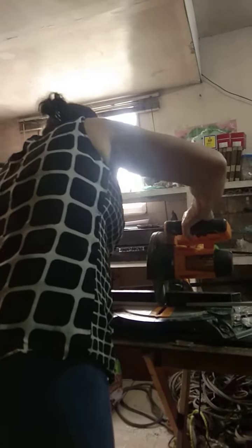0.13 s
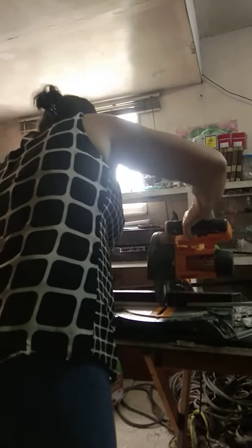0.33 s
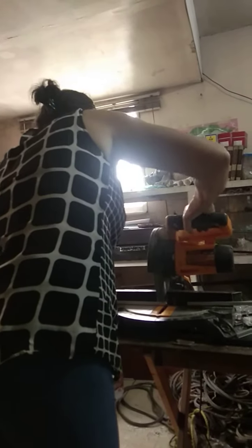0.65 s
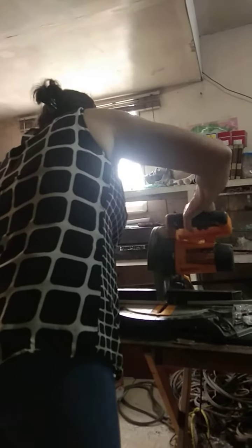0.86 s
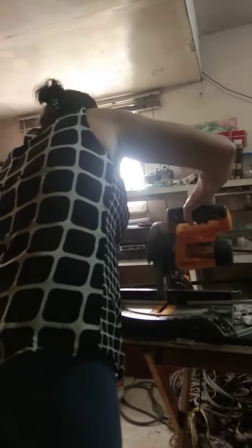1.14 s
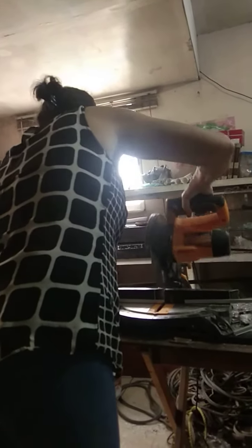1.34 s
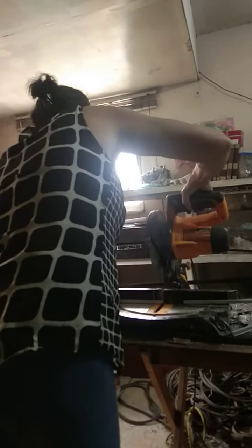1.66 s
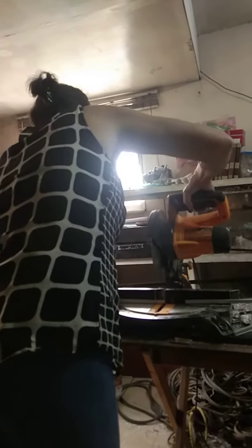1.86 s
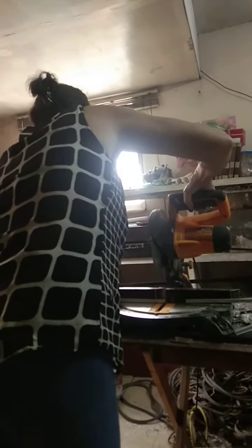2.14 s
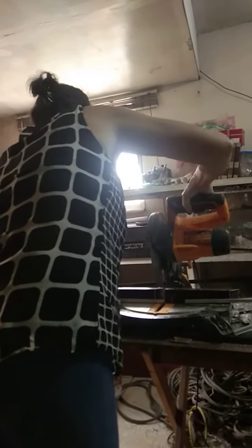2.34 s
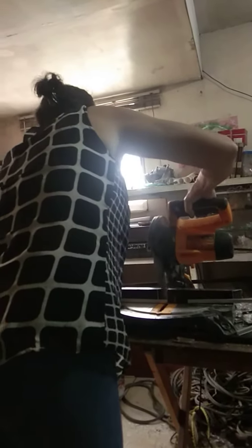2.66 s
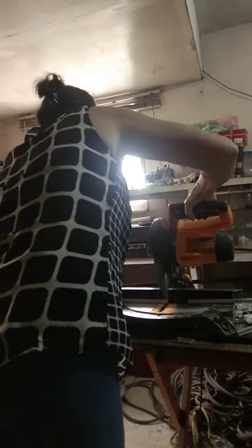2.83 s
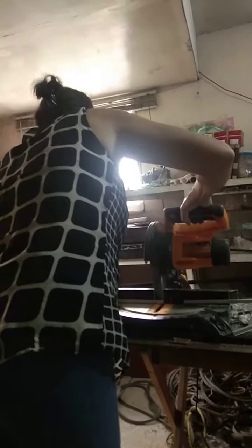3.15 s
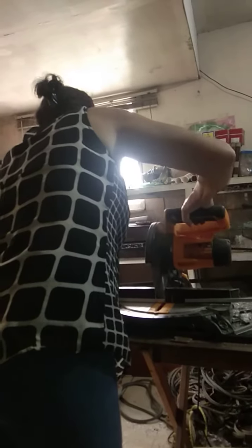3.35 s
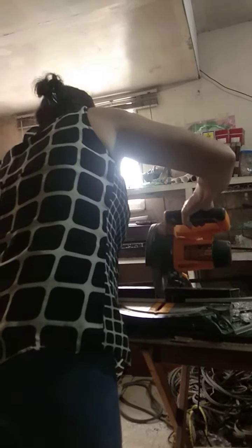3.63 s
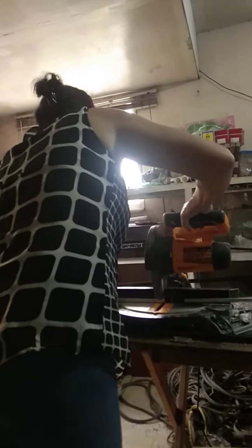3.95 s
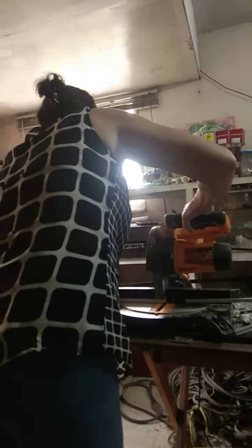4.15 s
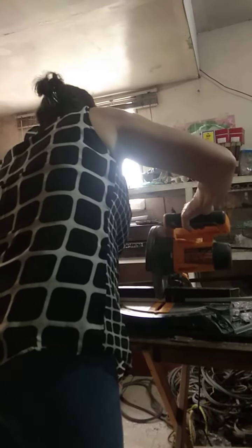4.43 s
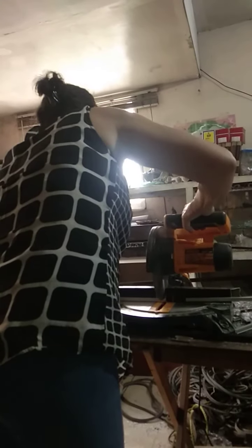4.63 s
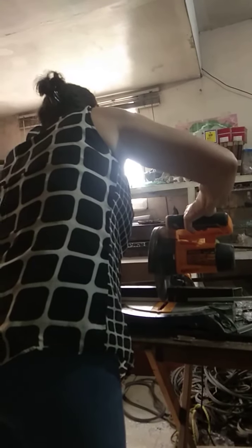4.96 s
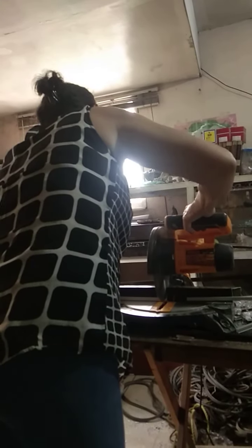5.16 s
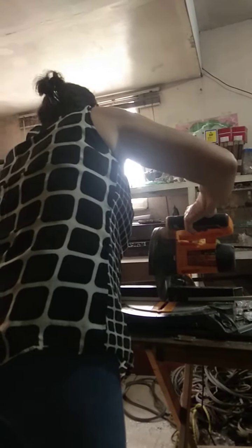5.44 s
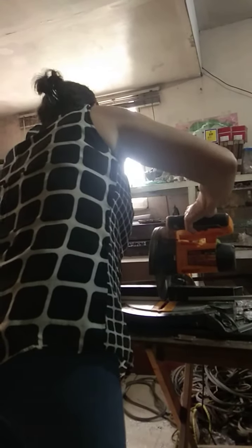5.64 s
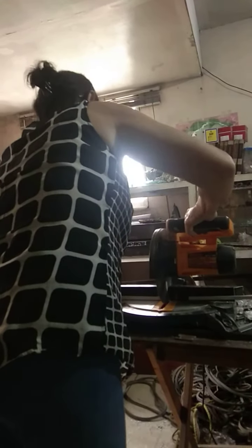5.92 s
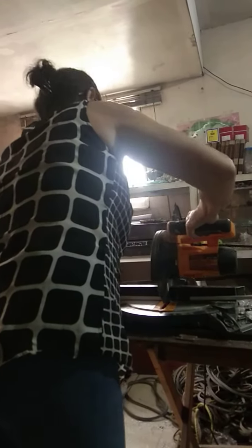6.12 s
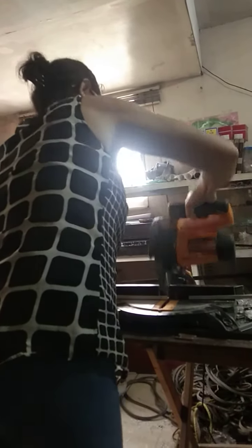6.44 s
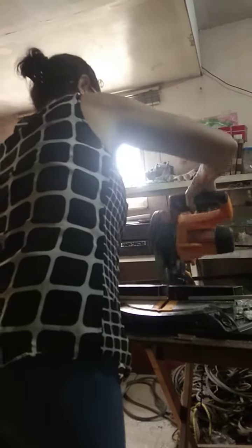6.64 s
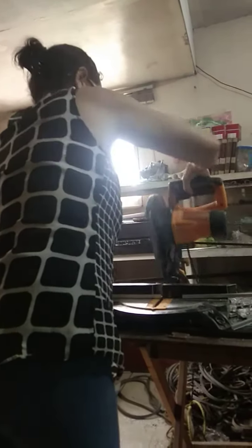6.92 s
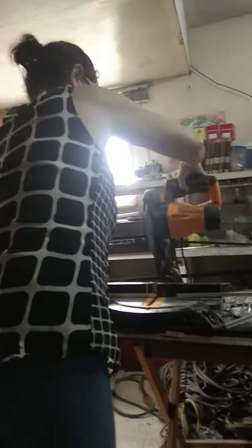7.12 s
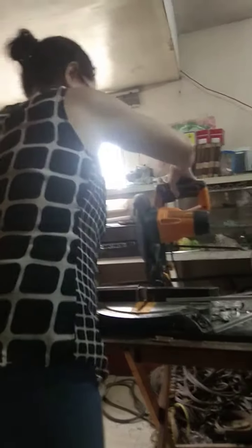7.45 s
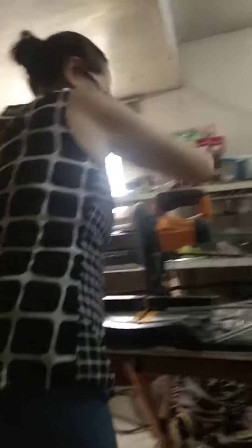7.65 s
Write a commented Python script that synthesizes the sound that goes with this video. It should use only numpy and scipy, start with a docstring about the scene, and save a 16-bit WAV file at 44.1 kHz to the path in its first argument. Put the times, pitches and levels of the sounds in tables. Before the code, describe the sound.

An electric miter saw snaps on, whines up to speed, squeals and knocks through a brief cut, then starts winding down.

```python
"""A small workshop, close to an electric mitre saw; outside, an engine idles over a low drone.
A hand rubs the grip, the switch snaps, and the motor kicks and runs up: its fourteen-bladed fan whines
at the blade-passing frequency over rushing air, gear rattle and hiss from vents, brushes and teeth.
The blade binds in the work with a thin stick-slip squeal and a few knocks; then the saw coasts down
against drag and friction, and the blade starts to ring in its natural modes."""
import sys
import numpy as np
from scipy import signal
from scipy.fft import rfft, irfft
from scipy.io import wavfile
from scipy.ndimage import uniform_filter1d, minimum_filter1d

SR = 44100
rng = np.random.default_rng(int(sys.argv[2]) if len(sys.argv) > 2 else 0)


def persist_wave(psi):
    """Save psi, clipped to +-1, as 16-bit WAV."""
    counts = np.round(np.clip(psi, -1, 1) * 32767).astype(np.int16)
    wavfile.write(sys.argv[1], SR, np.atleast_2d(counts).T)


N = 343098
TIME = np.arange(N) / SR
BINS = np.maximum(np.fft.rfftfreq(N, 1 / SR), 1)
START_S, STOP_S = 1.901, 6.562   # motor on and off
TOP_HZ = 494.2   # free-running rotor speed; every speed is in turns per second


def from_db(db):
    """Decibels to amplitude ratio."""
    return 10 ** (np.asarray(db) / 20)


def in_time(rows):
    """A (time_s, value) curve interpolated at every sample."""
    return np.interp(TIME, *np.transpose(rows))


def at_hz(response, hz):
    """Gain of a frequency response at the given pitches."""
    knots, db = np.transpose(response)
    return from_db(np.interp(np.log(hz), np.log(knots), db))


def shaped(gain):
    """White noise filtered by a gain at each frequency, then scaled to unit power."""
    x = irfft(rfft(rng.standard_normal(N)) * gain, N)
    return x / np.sqrt(np.mean(x ** 2) + 1e-20)


def noise(spectrum):
    """Unit-power noise of a given spectral shape, falling steeply beyond its ends."""
    beyond = np.log(BINS / np.clip(BINS, spectrum[0][0], spectrum[-1][0]))
    return shaped(at_hz(spectrum, BINS) * from_db(-66 * np.abs(beyond)))


def resonant_noise(modes):
    """Unit-power noise through resonances whose powers add."""
    power = sum((from_db(db) / (1 + ((BINS - hz) / width) ** 2)) ** 2 for hz, width, db in modes)
    return shaped(np.sqrt(power))


def drift(rate_hz):
    """Low-passed random fluctuation with a spread of one."""
    return shaped(1 / (1 + (BINS / rate_hz) ** 2))


def angle(hz):
    """Phase as the running integral of frequency."""
    return 2 * np.pi * np.cumsum(hz) / SR


def tone(phase):
    """A unit-power sine with a random starting phase."""
    return np.sqrt(2) * np.sin(phase + rng.uniform(0, 2 * np.pi))


def swell(centre_s, length_s):
    """A raised-cosine rise and fall."""
    return np.cos(np.pi * np.clip((TIME - centre_s) / length_s, -.5, .5)) ** 2


def swells(rows):
    """Summed envelope of a series of swells."""
    return sum(from_db(db) * swell(s, length) for s, length, db in rows)


def sinking(depth_db):
    """Gain of an outdoor sound, which sinks by depth_db once the saw starts."""
    sink_s = .46
    return from_db(-depth_db * (1 - np.exp(-np.maximum(TIME - START_S, 0) / sink_s)))


def idling_engine():
    """Periodic firing gives harmonics and half-orders of a rate that settles as the sound fades."""
    # exhaust partials: firing_multiple, level_db
    partials = [(.5, -20), (1, -1), (1.5, -7), (2, -3.5), (2.5, -10), (3, -1), (4, 3), (5, -3), (6, -4),
                (7, -6), (8, -7.5), (9, -11.5), (10, -12.5), (11, -16), (12, -16), (13, -20.5)]
    firing_hz = 55.8 + 3.3 * np.exp(-TIME / .35)
    firing = angle(firing_hz * (1 + .0026 * drift(14)))
    exhaust = sum(from_db(db + 3.4 * drift(3.2)) * tone(k * firing) for k, db in partials)
    return from_db(-40 - 3 * np.minimum(TIME, START_S)) * sinking(22.5) * exhaust


def yard():
    """A wavering drone and broadband outdoor noise, with narrow noise bands swelling as low rumbles."""
    # rumble around the drone: frequency_hz, density_db
    rumble = [(38, -20), (52, 0), (66, 6), (78, -17), (100, -23)]
    # swelling rumbles: centre_s, length_s, level_db, pitch_hz
    surges = [(.65, 1.4, -33, 68.6), (2.8, 1.3, -46.5, 68), (4.55, 2.4, -48.5, 59), (5.9, 1.2, -58, 56),
              (7.55, 1.6, -51.5, 86)]
    # outdoor background: frequency_hz, density_db
    background = [(15, -38), (25, -19), (50, -3), (76, -3), (178, -14), (225, -6), (331, -12.5), (397, -15),
                  (737, -20), (1140, -21.5), (1680, -28), (4730, -27.5), (5970, -36), (8360, -61),
                  (12000, -74), (15600, -104), (22000, -120)]
    drone_hz, width_hz = 67.4, 8.4
    drone = from_db(2) * tone(angle(drone_hz * (1 + .012 * drift(5.6)))) + from_db(-3) * noise(rumble)
    hums = sum(from_db(db) * swell(s, length) * resonant_noise([(hz, width_hz, 0)])
               for s, length, db, hz in surges)
    return from_db(-39.5) * sinking(22) * drone + hums + from_db(-38.5) * sinking(15) * noise(background)


def handling():
    """Sliding friction makes uneven noise as the hand shifts on the grip and the arm slides down."""
    # rubbing movements: centre_s, length_s, level_db
    rubs = [(.41, 0.49, -50.5), (1.25, .9, -53.5), (1.75, .5, -60)]
    # friction noise: frequency_hz, density_db
    scrape = [(2000, -16), (2800, -6), (3700, -18), (4800, 2), (5600, -5), (6500, -13), (7500, -28)]
    return swells(rubs) * from_db(2 * drift(40)) * noise(scrape)


def brief_tones():
    """Short wavering tones: creaks, motor whistles, and harmonics of the blade's stick-slip squeal."""
    # creaks, whistles and squeal harmonics: centre_s, pitch_hz, level_db, length_s, wander_hz
    tones = [(1.39, 1500, -51, .24, 14), (1.4, 2720, -56, .5, 130), (2.11, 1215, -27, .42, 25),
             (2.115, 5920, -22, .1, 30), (5.25, 7810, -31, .3, 16), (5.4, 7770, -34, .26, 18),
             (5.36, 3880, -33, .45, 40), (5.46, 2950, -22, .08, 110), (5.91, 2700, -25, .1, 50),
             (6.0, 7720, -38, .36, 20), (6.0, 11580, -49, .32, 35), (6.59, 2920, -22, .14, 12)]
    return sum(from_db(db) * swell(s, length) * tone(angle(hz + wander * drift(48)))
               for s, hz, db, length, wander in tones)


def knocks():
    """Impacts excite damped vibration: a crack in the saw, a thud in the bench and its lowest mode."""
    # switch, start-up kick and teeth catching: start_s, crack_db, thud_db, decay_s
    blows = [(1.9, -14, -39, 0.019), (1.908, -25, -16.5, 0.029), (1.932, -27, -18.5, 0.037),
             (5.459, -18, -46, 0.016), (5.77, -25, -39, .02), (5.893, -19, -30, 0.015),
             (5.908, -18, -38, .008), (6.092, -7.5, -25, 0.022)]
    # the struck saw: frequency_hz, density_db
    crack_spectrum = [(250, -47), (450, -5), (650, -14), (880, 1), (1200, -11), (1900, -2), (2600, 2.5),
                      (3800, 2), (4700, 3), (6500, -0.5), (8000, -22), (12000, -30)]
    # the struck bench: frequency_hz, density_db
    thud_spectrum = [(40, -24), (90, -13), (170, 7.5), (300, 6), (500, -2), (1100, -0.5), (2000, -15),
                     (4000, -50)]
    attack_s, bench_hz, bench_decay_s = .002, 125, .0057
    crack, thud, thump = np.zeros((3, N))
    for start_s, crack_db, thud_db, decay_s in blows:
        age = np.maximum(TIME - start_s, 0)
        envelope = (1 - np.exp(-age / attack_s)) * np.exp(-np.minimum(age / decay_s, 50))
        crack += from_db(crack_db) * envelope
        thud += from_db(thud_db) * envelope
        bench_mode = np.sin(2 * np.pi * bench_hz * age) * np.exp(-np.minimum(age / bench_decay_s, 50))
        thump += from_db(thud_db) * bench_mode
    return crack * noise(crack_spectrum) + thud * noise(thud_spectrum) + thump


def rotor_motion():
    """Speed rises as current (1 at stall) falls; switched off, air drag and bearing friction slow it."""
    # load of the cut: time_s, speed_lost_hz
    load = [(5.05, 0), (5.45, 3.9), (5.85, 4.3), (6.12, 7), (6.4, 2.9), (6.56, 2)]
    kick_share, kick_s, climb_s = .4955, .0808, .411   # a quick kick, then a slow climb
    drag_s, friction_s = 2.3, 11.4
    on_s, off_s = np.maximum(TIME - START_S, 0), np.maximum(TIME - STOP_S, 0)
    current = kick_share * np.exp(-on_s / kick_s) + (1 - kick_share) * np.exp(-on_s / climb_s)
    driven = TOP_HZ * (1 - current) - in_time(load)
    speed = driven * np.exp(-off_s / friction_s) / (1 + off_s / drag_s)
    return np.maximum(speed, 1), current


def mains_throb(depth):
    """Amplitude modulation: inrush current pulses the torque twice per mains cycle, then dies away."""
    mains_hz, fade_s = 60, .15
    return 1 + depth * np.exp(-np.abs(TIME - START_S) / fade_s) * np.sin(2 * np.pi * 2 * mains_hz * TIME)


def reverberation(x, t60_s, wet_db):
    """Direct sound plus dense reflections that decay exponentially."""
    t = TIME[:SR // 2]
    tail = rng.standard_normal(len(t)) * from_db(-60 * t / t60_s) * (t > .003)
    wet = signal.fftconvolve(x, tail / np.linalg.norm(tail))[:N]
    return (x + from_db(wet_db) * wet) / np.sqrt(1 + from_db(wet_db) ** 2)


def motor_whine(speed, current):
    """Fan blades and commutator bars sound at their passing frequencies, radiated by the housing."""
    # radiation of the fan tone: pitch_hz, level_db
    fan_response = [(1800, -57), (2850, -31), (3550, -19), (4050, -18.5), (4400, -23.5), (4800, -14),
                    (5100, -13), (5450, -21), (5700, -17), (6100, -21.5), (6500, -20), (6850, -20.5)]
    # radiation of its octave: pitch_hz, level_db
    octave_response = [(5500, -49), (8100, -43.5), (9200, -41), (9900, -42.5), (10400, -55), (11300, -52),
                       (13000, -53), (13800, -53)]
    # radiation of the commutator tone: pitch_hz, level_db
    bar_response = [(2150, -48), (2400, -25.5), (3200, -24.5), (3600, -25.5), (3900, -37), (4400, -25.5),
                    (5000, -24), (5450, -31), (5900, -30.5)]
    # the fan tone fades in and out, its overtones slightly the opposite way: time_s, gain_db
    fan_fade = [(2.12, 0), (2.21, -7), (2.29, 0), (2.43, 5.5), (2.55, 1.5), (2.78, 3), (2.92, -4.5),
                (3.55, 3), (3.75, -9.5), (4.65, -10), (5.04, -7), (5.13, -16), (5.35, -19), (5.46, -4.5),
                (6.09, -7.5), (6.2, -0.5), (6.39, -14), (6.63, -2)]
    # the octave stands out: centre_s, length_s, level_db
    octave_swells = [(4.0, .7, -49)]
    blades, bars, stall_boost_db = 14, 12, 23
    rotor, fade_db = angle(speed), in_time(fan_fade)
    fan = blades * rotor + .21 * drift(70)   # turbulence and gear play shake the phase
    whine = at_hz(fan_response, blades * speed) * tone(fan) * from_db(fade_db + 2 * drift(20))
    slow = np.clip((370 - speed) / 40, 0, 1)   # the third harmonic sounds only at low speed
    overtones = tone(2 * fan) + from_db(-23) * slow * tone(3 * fan)
    overtone_gain = at_hz(octave_response, 2 * blades * speed) * from_db(-.15 * fade_db)
    whine += (overtone_gain + swells(octave_swells)) * overtones
    bar_gain = at_hz(bar_response, bars * speed) * from_db(stall_boost_db * current)
    whine += bar_gain * tone(bars * rotor + 1.3 * drift(47))
    return reverberation(whine * mains_throb(depth=1.6), t60_s=.21, wet_db=-9.5)


def rushing_air(current):
    """Turbulence in the guard excites its resonances, more strongly at high current."""
    # churned air: frequency_hz, density_db
    turbulence = [(110, -18.5), (200, -18.5), (390, -9.5), (470, -5), (530, -11), (750, -5.5), (1150, -7),
                  (1320, -6), (1700, -2.5), (2350, -5.5), (2600, -6)]
    # modes of blade guard and bench: pitch_hz, width_hz, level_db
    guard_modes = [(571.4, 13.7, 5.5), (640.6, 18, 1.5), (707, 45, -6.5), (844.4, 32, 3), (980, 16.5, 4),
                   (1047, 11.6, 2.5), (1138, 45, 4), (1420, 70, -1.5), (1651, 20, 0.5), (1812, 40, 2.5),
                   (2150, 30, -4.5)]
    rush = from_db(-30) * noise(turbulence) + from_db(-33) * resonant_noise(guard_modes)
    return from_db(9 * current) * rush


def gear_rattle(binding):
    """Forced vibration: the gears shake the housing, whose modes grow louder when the blade binds."""
    # gear noise: frequency_hz, density_db
    rattle = [(1900, -14.5), (2350, -12), (2550, -4), (2900, 0), (3300, 1), (3700, 0), (4200, -4),
              (4800, -21), (6000, -29)]
    # modes of the motor housing: pitch_hz, width_hz, level_db
    housing_modes = [(2576, 36, -4), (2875, 54, -2.5), (3240, 130, -4), (3526, 38, 0.5), (3700, 43, -1),
                     (4330, 59, -9), (5030, 60, 3.5), (5260, 30, 0), (5210, 35, 3), (5870, 26, -1.5),
                     (6400, 30, -10)]
    drive = from_db(-24) + from_db(2) * binding
    return from_db(-19.5) * noise(rattle) + drive * resonant_noise(housing_modes)


def air_hiss(speed, binding):
    """Flow noise at vents and teeth grows with speed; the teeth hiss harder when the blade binds."""
    # air through the vents: frequency_hz, density_db
    vents = [(3500, -33), (4400, -5), (4750, -0.5), (5300, 0), (5900, -4), (6200, -8.5), (6600, -8.5),
             (7200, -33)]
    # air torn by the teeth: frequency_hz, density_db
    teeth = [(5800, -21), (6600, -5.5), (7000, 0.5), (7500, -4.5), (8000, -14.5), (8700, -18), (9700, -16),
             (11000, -23), (12500, -27.5), (14000, -22), (15500, -23.5)]
    full_flow_hz, teeth_db_per_octave = 307, 7.5
    weak_flow = np.clip(2 * (1 - speed / full_flow_hz), 0, 1)
    vent_gain = from_db(-16 - 8.5 * weak_flow)
    torn_air = from_db(-29 + teeth_db_per_octave * np.log2(np.maximum(speed / TOP_HZ, .4)))
    return vent_gain * noise(vents) + (torn_air + from_db(-5.5) * binding) * noise(teeth)


def reflections(x, echo_db, count=12):
    """Comb filtering: early echoes from bench, wall and shelves interfere with the direct sound."""
    lags = (rng.uniform(.002, .025, count) * SR).astype(int)
    echoes = sum((-1) ** k * np.pad(x, (lag, 0))[:N] for k, lag in enumerate(lags))
    return (x + from_db(echo_db) * echoes) / np.sqrt(1 + count * from_db(echo_db) ** 2)


def running_noise(speed, current, binding):
    """Rush, rattle and hiss add; uneven brush and gear contact modulates the rattle and hiss."""
    # level of all the running noise: time_s, gain_db
    level = [(1.9, 2), (2.35, 1.4), (2.7, 0.1), (3.3, 0), (3.7, -1.07), (4.9, 0.5), (5.45, 0), (5.54, -2.5),
             (5.74, -2.5), (6.3, -4), (6.6, -2.5), (7.35, -3.5), (7.78, -1.5)]
    rush = rushing_air(current)
    hiss = reflections(gear_rattle(binding) + air_hiss(speed, binding), echo_db=-23.5)
    chatter = from_db(.74 * drift(220))
    return from_db(in_time(level)) * (rush + hiss * chatter) * mains_throb(depth=.18)


def unbalance_hum(speed):
    """Rotor unbalance shakes once a turn, with speed squared, and sweeps through a housing resonance."""
    resonance_hz, width_hz = 454.3, 18
    resonance = 1 / (1 + ((speed - resonance_hz) / width_hz) ** 4)
    gain = from_db(-48) * (speed / TOP_HZ) ** 2 + from_db(-36.5) * resonance
    return gain * tone(angle(speed) + .16 * drift(14))


def kerf_squeal(binding):
    """Stick-slip friction on the blade's side gives an unsteady harmonic squeal in a spray of grit."""
    # squeal partials: harmonic_number, level_db
    partials = [(1, -12), (2, -5.5), (3, -30), (4, -0.5)]
    # spray of grit: frequency_hz, density_db
    grit = [(6000, -32), (7700, 3), (9000, -33), (12500, -17), (14200, -6), (15000, 2), (15500, 4)]
    squeal_hz = 3862
    slip = angle(squeal_hz * (1 + .0022 * drift(62)))
    squeal = sum(from_db(db) * tone(k * slip) for k, db in partials)
    return binding * (squeal * from_db(2 * drift(50) - 3.5) + from_db(-1) * noise(grit))


def blade_ring(speed):
    """With the power off, the blade resonates in its natural modes, louder as it slows."""
    # modes of the coasting blade: pitch_hz, width_hz, level_db
    modes = [(1210, 24, -7.5), (1633, 23, -1.5), (1782, 54, -0.5), (2150, 150, -16), (3350, 100, -4)]
    loudest_below_hz, fade_db_per_hz = 294, .17
    level_db = -22.5 - fade_db_per_hz * np.maximum(speed - loudest_below_hz, 0)
    return (TIME > STOP_S) * from_db(level_db) * resonant_noise(modes)


def scene():
    """Superposition of the saw and the sounds from outside, the same in both ears."""
    # the blade binds in the kerf: centre_s, length_s, level_db
    binds = [(5.25, .35, -33), (5.39, .14, -31), (5.46, .08, -25), (5.59, 0.21, -30), (5.68, .11, -33),
             (5.785, .1, -25), (5.905, 0.14, -20), (5.98, 0.14, -34), (6.07, .14, -27)]
    binding = swells(binds)
    speed, current = rotor_motion()
    switched_on = np.clip((TIME - START_S) / .004, 0, 1)
    running = motor_whine(speed, current) + unbalance_hum(speed) + running_noise(speed, current, binding)
    saw = switched_on * running + kerf_squeal(binding) + blade_ring(speed) + knocks() + brief_tones()
    return np.tile(saw + handling() + idling_engine() + yard(), (2, 1))


def record(dry):
    """Microphone self-noise adds faint hiss, a fast limiter holds the peaks, a low-pass cuts the top."""
    hiss_db, ceiling, cutoff_hz = -83, .84, 15600
    heard = dry + from_db(hiss_db) * rng.standard_normal(N)
    gain = minimum_filter1d(np.minimum(1, ceiling / (np.abs(heard) + 1e-9)), size=61)
    held = heard * uniform_filter1d(gain, size=61)
    return signal.sosfiltfilt(signal.ellip(10, .05, 60, cutoff_hz, fs=SR, output="sos"), held)


dry = scene()
out = record(dry)
persist_wave(out)
```